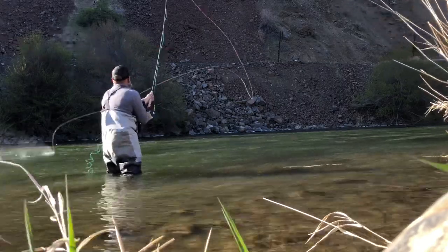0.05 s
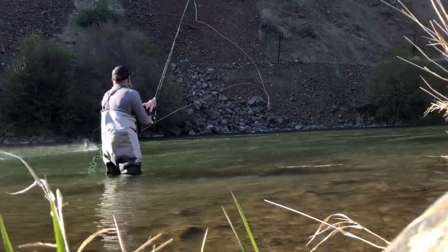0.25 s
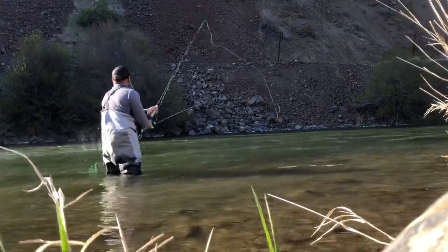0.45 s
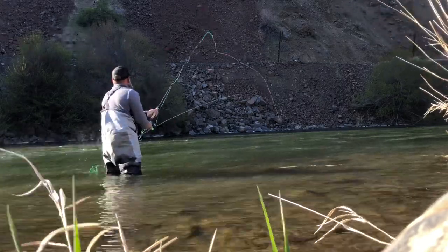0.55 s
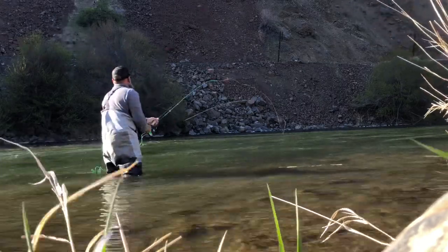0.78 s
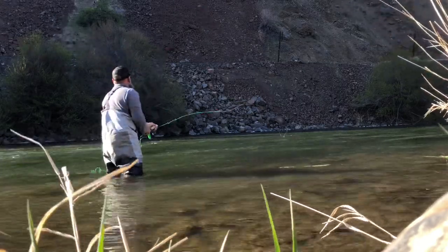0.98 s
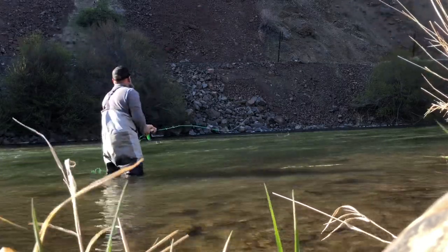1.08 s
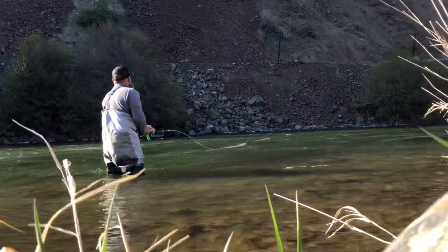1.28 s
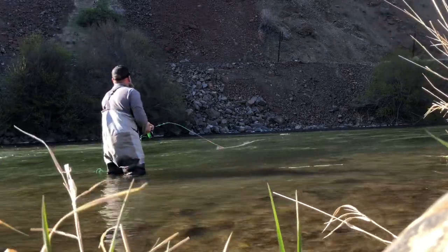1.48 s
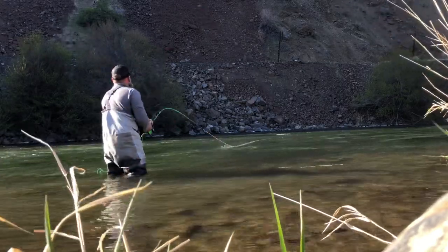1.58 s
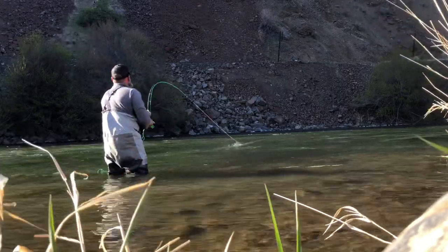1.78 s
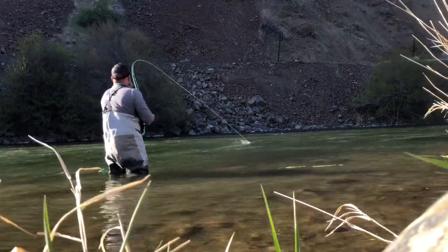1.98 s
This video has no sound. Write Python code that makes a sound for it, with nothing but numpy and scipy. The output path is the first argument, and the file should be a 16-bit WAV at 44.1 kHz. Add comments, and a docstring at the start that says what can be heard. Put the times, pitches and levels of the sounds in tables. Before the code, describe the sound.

Gusts of wind rumble and thump on a microphone on a riverbank. Early on, a fishing line splashes lightly and whistles through the air. The spray fades under crisp rustling grass, leaving a soft wash of water with small plops.

```python
"""Gusts of wind thump on the microphone over the soft wash of a river, each eddy a push and a pull.
Fine spray patters on the water, and dry grass rustles and ticks close by as blades and stalks touch.
An angler's line tears off the river with a splash, whistles through the air and lands again.
The spray thins out, and the water gives a few small plops."""
import sys
import numpy as np
from scipy import signal
from scipy.fft import rfft, irfft
from scipy.io import wavfile
from scipy.ndimage import uniform_filter1d

SR = 44100
rng = np.random.default_rng(int(sys.argv[2]) if len(sys.argv) > 2 else 0)


def digitize_waveform(pressure):
    """Quantize a signal to 16-bit integers and store it at the path in sys.argv[1].

    Rows of a 2-D input are taken as channels; values are limited to [-1, 1].
    """
    field = np.atleast_2d(pressure).T
    bounded = np.clip(field, -1, 1)
    quanta = np.round(bounded * 32767).astype(np.int16)
    wavfile.write(sys.argv[1], SR, quanta)


N = 90404


def undb(db):
    """Decibels to gain."""
    return 10 ** (np.asarray(db) / 20)


def unit(x):
    """Scale to rms 1."""
    return x / np.sqrt(np.mean(x ** 2) + 1e-20)


def clock():
    """Time of each sample in seconds."""
    return np.arange(N) / SR


def curve(rows):
    """Straight lines through (seconds, value) rows."""
    return np.interp(clock(), *np.array(rows, float).T)


def colour(x, points):
    """EQ a sound through (Hz, dB) points, at rms 1."""
    hz, db = np.array(points, float).T
    freqs = np.maximum(np.arange(N // 2 + 1) * SR / N, 1)
    gain = undb(np.interp(np.log(freqs), np.log(hz), db))
    return unit(irfft(rfft(x) * gain, N))


def band(x, hz, width_hz):
    """A steep resonance, at rms 1."""
    freqs = np.maximum(np.arange(N // 2 + 1) * SR / N, 1)
    detuning = (freqs ** 2 - hz ** 2) / (2 * freqs * width_hz)
    return unit(irfft(rfft(x) / (1 + 2 * detuning ** 2), N))


def wander(per_s):
    """Smooth random drift, at rms 1."""
    hold = max(int(SR / per_s), 1)
    steps = np.repeat(rng.standard_normal(N // hold + 1), hold)
    return unit(uniform_filter1d(steps, hold)[:N])


def impacts(per_s, scatter_db):
    """Tiny clicks at random moments, most weak and a few strong."""
    size = undb(scatter_db * np.minimum(rng.exponential(size=N), 5))
    return (rng.random(N) < per_s / SR) * size * np.sign(rng.standard_normal(N))


def burst(x, at, length, db):
    """Fade a sound in and out in a bell shape, at the given level in the middle."""
    bell = np.exp(-2 * ((clock() - at) / length) ** 2)
    return undb(db) * unit(x * bell) * np.sqrt(np.mean(bell ** 2))


def eddy_train(hz, half_cycles=0.42, scatter_db=2.5):
    """Eddies of one size pass in a loose rhythm, each a short push and pull of pressure."""
    spacing, reach = 2 * half_cycles * SR / hz, int(2 * SR / hz)  # samples
    train = np.zeros(N)
    for k, (late, size, turn, stretch) in enumerate(rng.standard_normal((int(N / spacing) + 2, 4))):
        centre = int((k + late / 4) * spacing)
        span = np.arange(max(centre - reach, 0), min(centre + reach, N))
        cycles = (span - centre) / SR * hz * np.exp(0.092 * stretch)
        bell = np.exp(-(cycles / half_cycles) ** 2)
        train[span] += undb(scatter_db * size) * bell * np.sin(2 * np.pi * (cycles + turn))
    return train


# The push of the gusts. Each row: time in seconds, level in dB.
GUST_LEVELS = [(0.0, -54), (0.08, -63.5), (0.11, -51), (0.15, -62), (0.22, -46), (0.25, -45), (0.3, -40.5),
               (0.32, -43), (0.37, -33), (0.43, -55), (0.49, -31), (0.51, -37), (0.53, -46), (0.55, -46.5),
               (0.59, -42.5), (0.64, -58.5), (0.69, -35.5), (0.72, -33.5), (0.75, -51), (0.79, -27.5),
               (0.82, -42), (0.85, -46.5), (0.89, -33.5), (0.95, -34), (0.98, -49), (1.0, -41),
               (1.08, -41.5), (1.1, -53.5), (1.13, -38.5), (1.19, -46.5), (1.22, -61), (1.31, -51.5),
               (1.35, -38), (1.38, -42), (1.4, -46.5), (1.51, -44.5), (1.56, -54.5), (1.59, -50),
               (1.66, -46), (1.68, -56), (1.7, -46), (1.74, -61), (1.81, -51.5), (2.02, -59.5),
               (2.05, -49.5)]
# Five eddy sizes, deepest first. Each row: frequency in Hz, relative level in a strong gust in dB,
# lead on the gust in seconds.
EDDY_SIZES = [(35.7, -5, 0.024), (58.03, -2.5, 0.003), (104.02, -7, 0.0053), (191.6, -15, 0.0123),
              (321.6, -31.5, 0.0014)]


def wind(level_db=-34.5, strong_gust_db=-34.5, knee_hz=105, growth_per_octave=0.56, low_cut_hz=29.6):
    """Eddies buffet the microphone; small ones need strong wind, and all swell just ahead of the gust."""
    gust_db = curve(GUST_LEVELS) - strong_gust_db
    rumble = np.zeros(N)
    for hz, db, lead in EDDY_SIZES:
        growth = 1 + growth_per_octave * max(np.log2(hz / knee_hz), 0)  # dB per dB of gust
        ahead_db = np.interp(clock() + lead, clock(), gust_db)
        rumble += band(eddy_train(hz), hz, hz) * undb(level_db + db + growth * ahead_db)
    return signal.sosfilt(signal.butter(2, low_cut_hz, "high", fs=SR, output="sos"), rumble)


# The tone of the current. Each row: frequency in Hz, relative gain in dB.
CURRENT_EQ = [(88, -17), (150, -13), (177, -3), (588, -8), (721, -9.5), (791, -9), (1080, -10),
              (1260, -10.5), (2110, -14.5), (2490, -11.5), (12400, -12.5), (16100, -40), (22000, -120)]


def current(level_db=-61.5, flicker_db=1.75):
    """Running water makes a soft wash whose bands each flicker on their own."""
    wash = np.zeros(N)
    for hz in np.geomspace(150, 18000, 12):
        hiss = np.sqrt(hz) * band(rng.standard_normal(N), hz, hz / 2)
        wash += hiss * undb(flicker_db * wander(per_s=21.73))
    return undb(level_db) * colour(wash, CURRENT_EQ)


def bubbles(level_db=-72.5, per_s=220):
    """Small bubbles ring in the current, each rising in pitch as it dies away."""
    fizz = np.zeros(N)
    for when, pitch, size in rng.random((int(per_s * N / SR), 3)):
        hz, start = 380 * 11 ** pitch, int(when * N)
        cycles = np.arange(min(int(30 * SR / hz), N - start)) * hz / SR
        chirp = np.sin(2 * np.pi * cycles * (1 + 0.0056 * cycles))
        fizz[start:start + len(cycles)] += undb(22 * size ** 2) * np.exp(-cycles / 5) * chirp
    return undb(level_db) * unit(fizz)


# The fade of the falling spray. Each row: time in seconds, level in dB.
SPRAY_LEVELS = [(0, -51.5), (.11, -48), (.18, -51), (.32, -50.5), (.42, -53), (.58, -52), (.72, -56),
                (.9, -59), (1.3, -57), (1.6, -75), (2.05, -86)]
# The tone of the drops. Each row: frequency in Hz, relative gain in dB.
SPRAY_EQ = [(300, 4), (700, -2.5), (1500, -1), (2300, -0.5), (3600, 1.5), (6000, 1), (8000, 1.5),
            (10000, 0.5), (12400, 1.5)]
DROPS_PER_S, DROP_SCATTER_DB = 8000, 2


def spray():
    """Fine drops patter on the river and fade away."""
    return colour(impacts(DROPS_PER_S, DROP_SCATTER_DB), SPRAY_EQ) * undb(curve(SPRAY_LEVELS))


# The swell of the rustle. Each row: time in seconds, level in dB.
GRASS_LEVELS = [(0, -50.5), (.5, -52), (.71, -51), (.79, -54), (.88, -55.5), (1.03, -56), (1.13, -51.5),
                (1.22, -51), (1.26, -55), (1.41, -53), (1.48, -57.5), (1.66, -55), (1.8, -61.5),
                (2.05, -61)]
# Its dry, bright tone. Each row: frequency in Hz, relative gain in dB.
GRASS_EQ = [(1000, -25), (2500, -10.5), (4000, -10), (6000, -7), (8000, -4.5), (10000, -4), (12000, 2)]


def grass(flutter_db=6):
    """Dry blades rub in fluttering bursts of tiny clicks."""
    rubs = colour(impacts(per_s=5400, scatter_db=3.5), GRASS_EQ)
    flutter = undb(flutter_db * np.tanh(wander(per_s=120)))
    return unit(rubs * flutter) * undb(curve(GRASS_LEVELS))


# Crisp stalk ticks. Each row: peak time and length in seconds, centre and width in Hz, level in dB.
STALK_TICKS = [(.0315, 0.0031, 10300, 800, -46.5), (.643, 0.0037, 12100, 2000, -59),
               (.719, .006, 12100, 2000, -51), (.744, 0.0064, 10400, 5000, -52),
               (1.0595, 0.0044, 11340, 800, -50), (1.132, .007, 11400, 2500, -52),
               (1.161, .006, 9000, 7000, -51), (1.18, 0.0035, 10900, 3000, -48.5),
               (1.299, 0.0079, 4460, 2000, -57)]


def stalk_ticks():
    """Stalks knock together, each touch a tiny burst of high, resonant noise."""
    return sum(burst(band(rng.standard_normal(N), hz, width), at, length, db)
               for at, length, hz, width, db in STALK_TICKS)


# The line's splashes. Each row: peak time and length in seconds, centre and width in Hz, level in dB.
LINE_SPLASHES = [(0.082, 0.21, 1200, 900, -62.5), (.12, 0.035, 7400, 4000, -54),
                 (0.212, 0.023, 3640, 2320, -49.5), (0.251, 0.022, 3760, 2200, -51.5),
                 (0.31, 0.073, 4420, 2840, -49.5), (.508, 0.013, 2900, 690, -58),
                 (0.583, 0.015, 4000, 2000, -57), (1.16, 0.18, 4100, 2500, -69)]


def splashes():
    """The line throws up showers of drops as it tears off the water and lands again."""
    return sum(burst(band(impacts(DROPS_PER_S, DROP_SCATTER_DB), hz, width), at, length, db)
               for at, length, hz, width, db in LINE_SPLASHES)


# The line cutting the air. Each row: peak time and length in seconds, first pitch, last pitch and
# width in Hz, level in dB.
LINE_SWISHES = [(0.093, .11, 1650, 1572, 516, -62), (0.239, 0.079, 1467, 1057, 250.4, -61.5)]


def line_swish():
    """Air whistles round the line, falling in pitch as it slows."""
    swishes = np.zeros(N)
    for at, length, first_hz, last_hz, width, db in LINE_SWISHES:
        hz = curve([(at - length / 2, first_hz), (at + length / 2, last_hz)])
        phase = 2 * np.pi * np.cumsum(hz) / SR
        whistle = wander(width) * np.cos(phase) + wander(width) * np.sin(phase)
        swishes += burst(whistle, at, length, db)
    return swishes


# Single hard wind thumps. Each row: peak time and length in seconds, pitch in Hz, level in dB.
EDDY_SLAPS = [(0.223, 0.0074, 185.3, -42.5), (0.481, 0.0075, 240, -41), (0.496, 0.027, 62, -28.5),
              (0.708, 0.041, 65.8, -36.5), (0.777, 0.0065, 269.4, -35.5), (.809, .012, 290, -50.5),
              (0.926, 0.011, 179.7, -36.5), (1.345, .014, 150, -40), (1.37, 0.032, 57.73, -39.5)]


def eddy_slaps():
    """Each strong eddy rocks the microphone's diaphragm for a cycle or two."""
    return sum(burst(np.sin(2 * np.pi * (hz * clock() + rng.random())), at, length, db)
               for at, length, hz, db in EDDY_SLAPS)


# Plops and gurgles. Each row: peak time and length in seconds, pitch and width in Hz, level in dB.
WATER_PLOPS = [(.592, 0.011, 1770, 300, -55.5), (1.48, 0.067, 470, 45, -62.5),
               (1.963, 0.004, 1630, 120, -61.5), (2.0, 0.083, 424, 300, -66)]


def plops():
    """The water plops in short, hollow resonances."""
    return sum(burst(band(rng.standard_normal(N), hz, width), at, length, db)
               for at, length, hz, width, db in WATER_PLOPS)


def scene():
    """Wind, water, grass and line as heard from the bank, in mono."""
    bed = wind() + current() + bubbles() + spray() + grass()
    accents = stalk_ticks() + splashes() + line_swish() + eddy_slaps() + plops()
    return (bed + accents)[None]


def record(dry, high_cut_hz=12400):
    """A steep high cut takes the very top off the mix."""
    return signal.sosfilt(signal.ellip(12, .2, 70, high_cut_hz, fs=SR, output="sos"), dry)


dry = scene()
out = record(dry)
digitize_waveform(out)
```